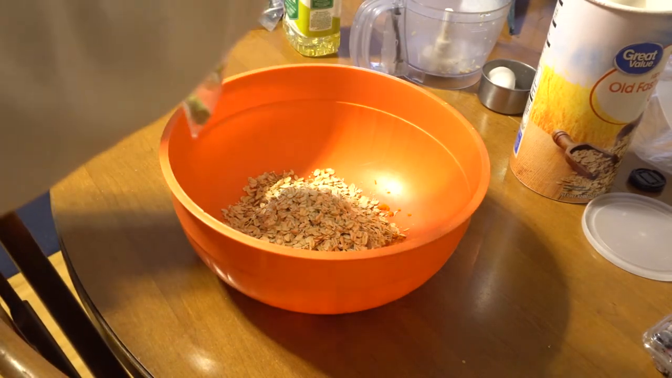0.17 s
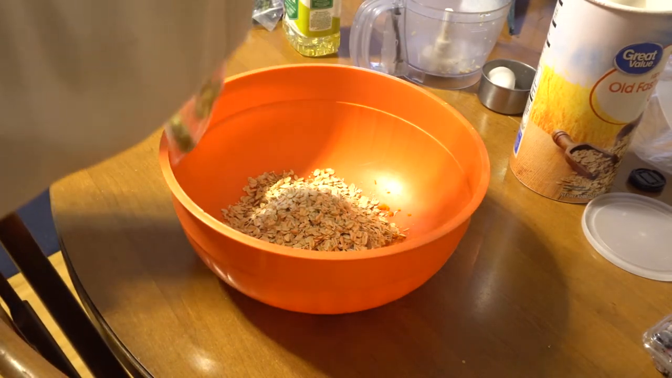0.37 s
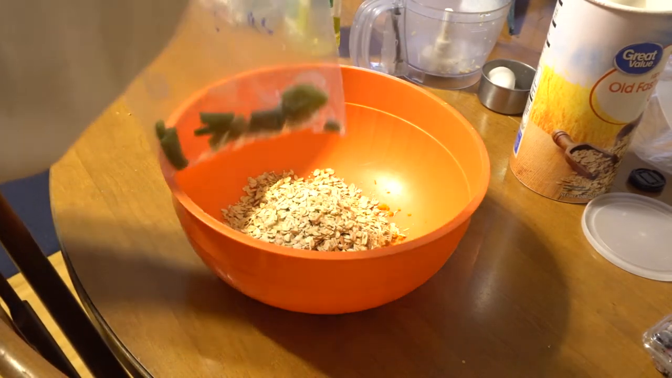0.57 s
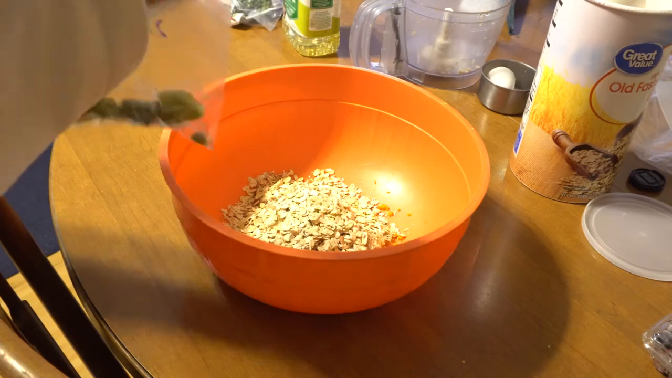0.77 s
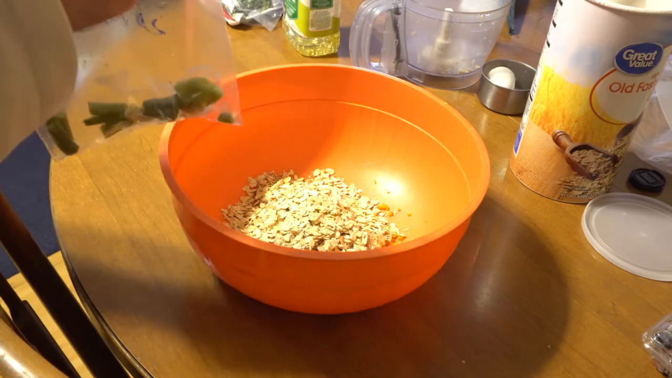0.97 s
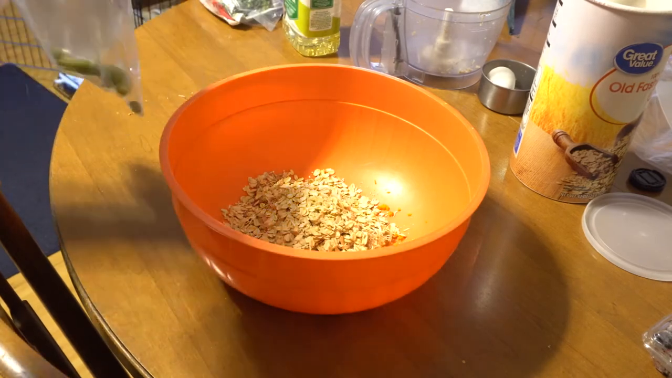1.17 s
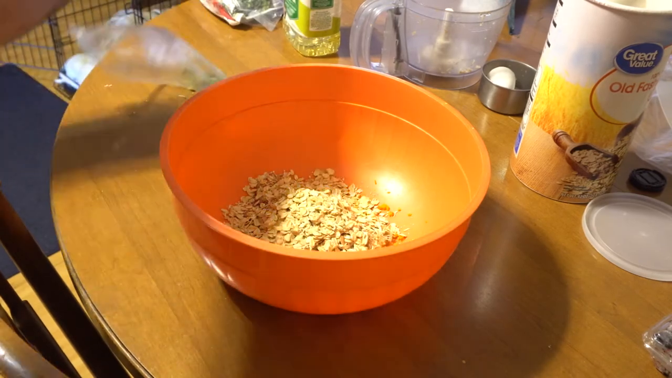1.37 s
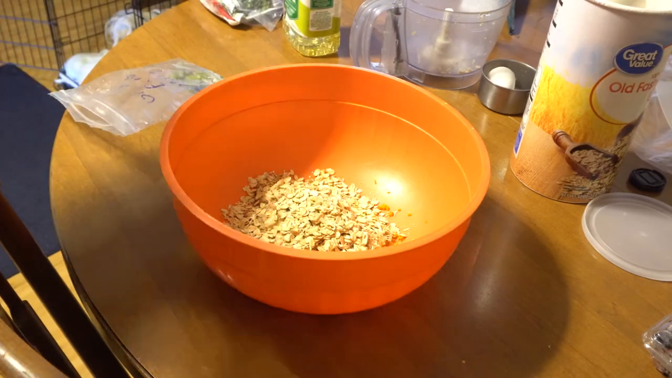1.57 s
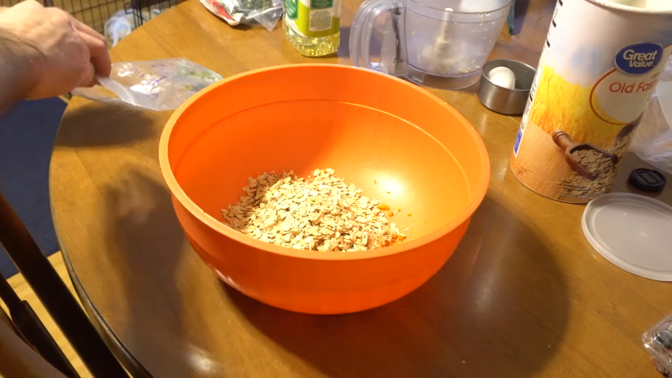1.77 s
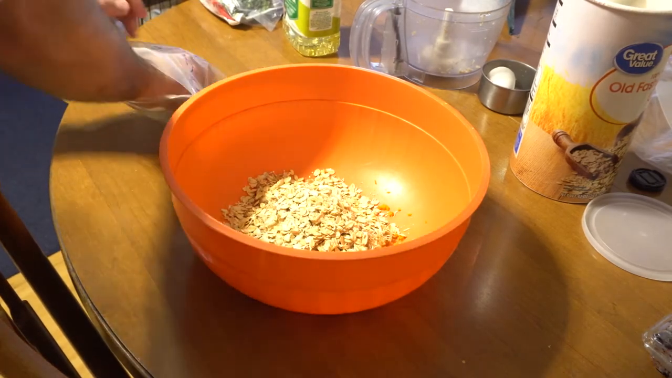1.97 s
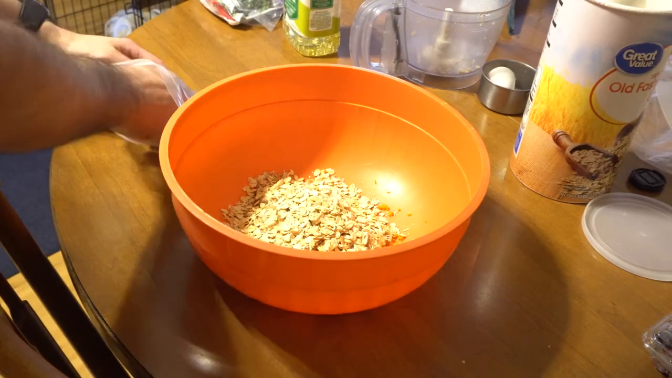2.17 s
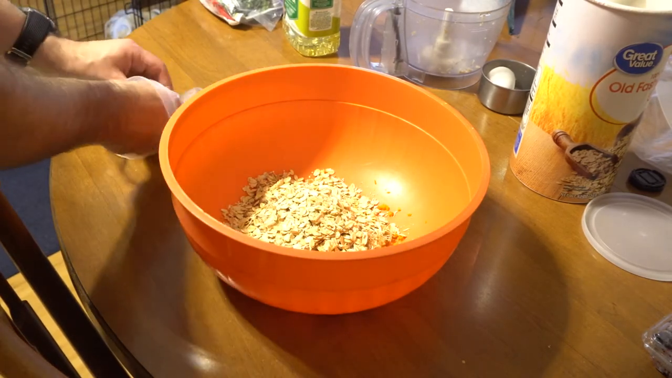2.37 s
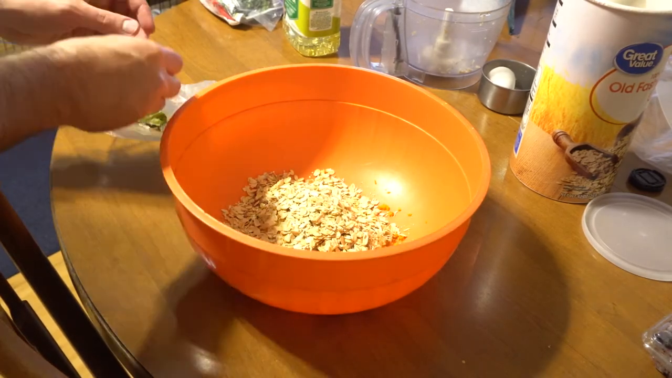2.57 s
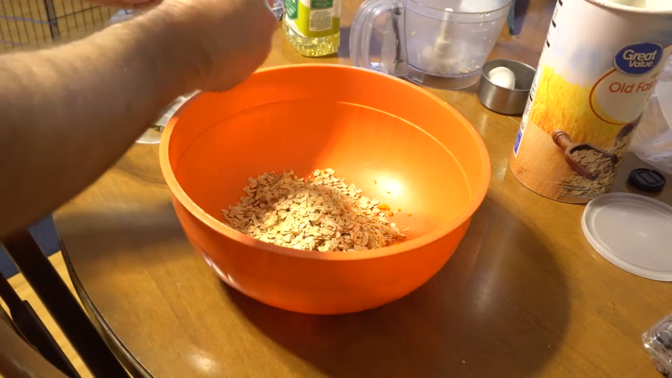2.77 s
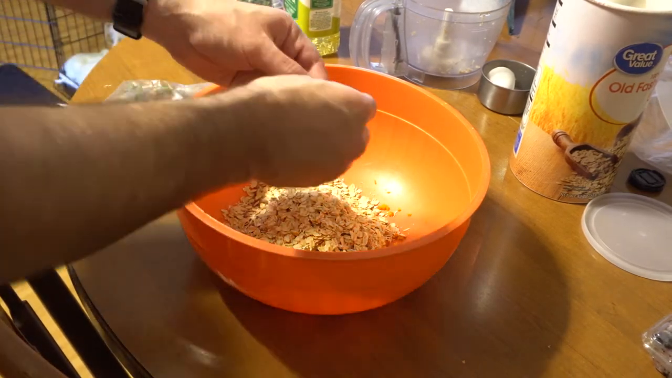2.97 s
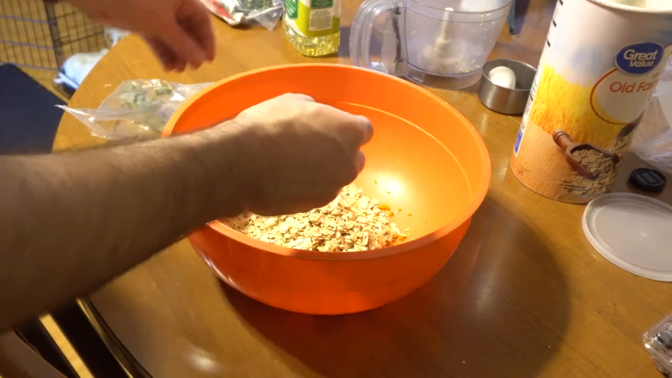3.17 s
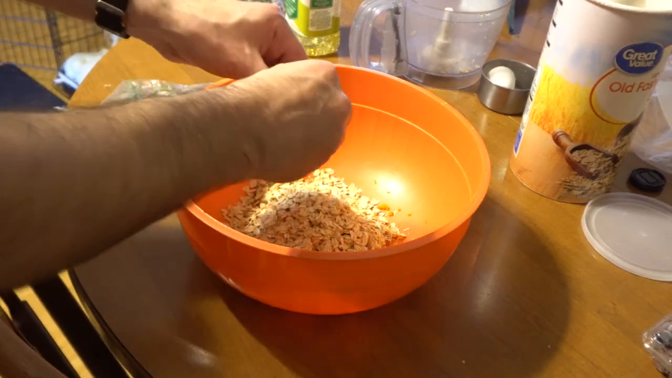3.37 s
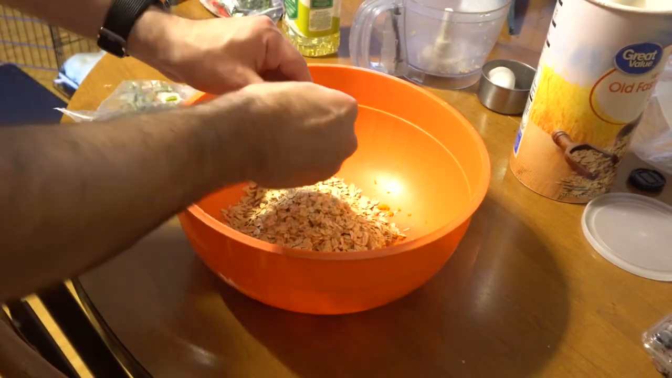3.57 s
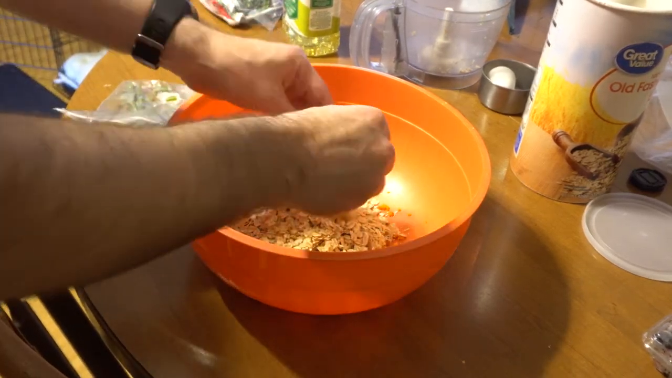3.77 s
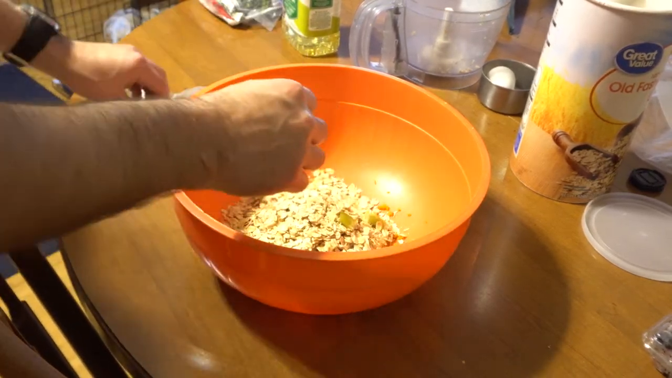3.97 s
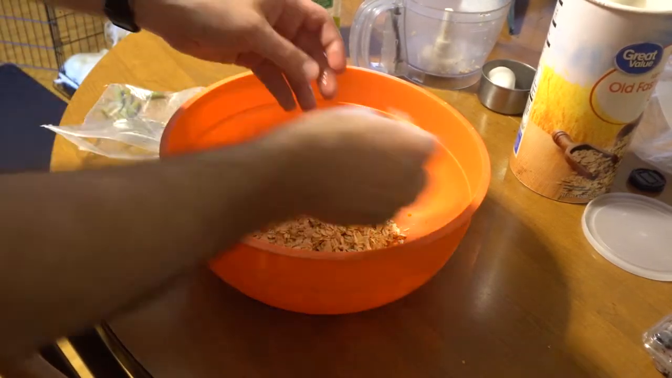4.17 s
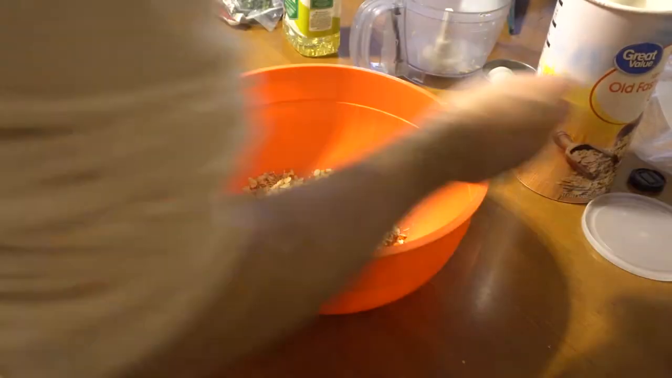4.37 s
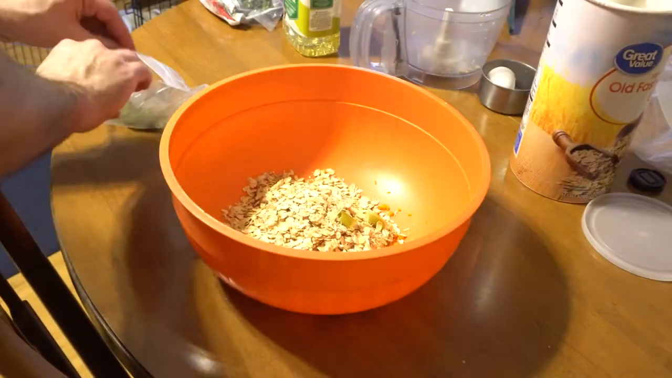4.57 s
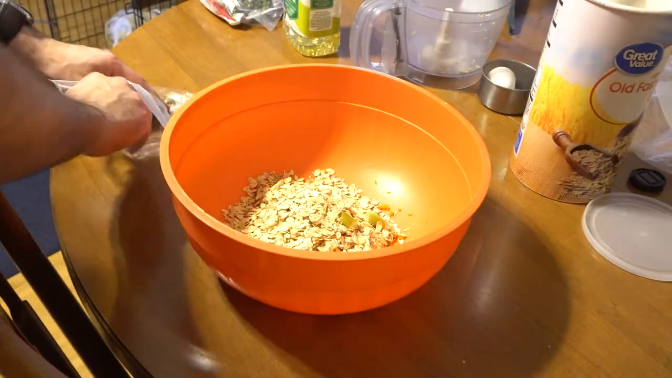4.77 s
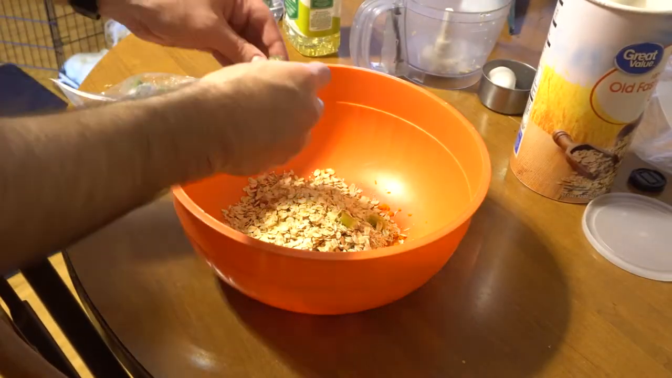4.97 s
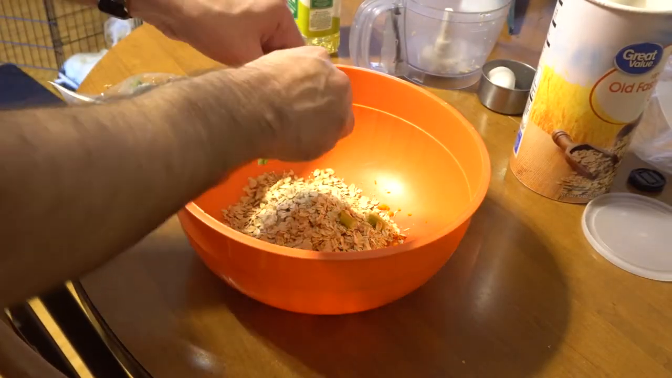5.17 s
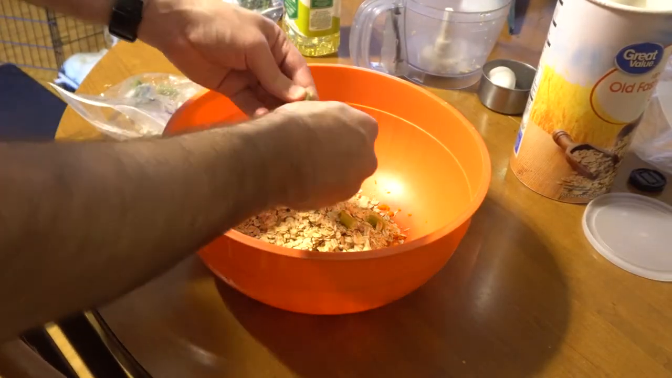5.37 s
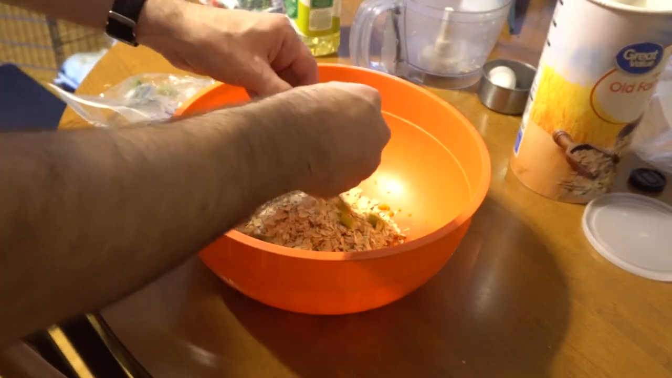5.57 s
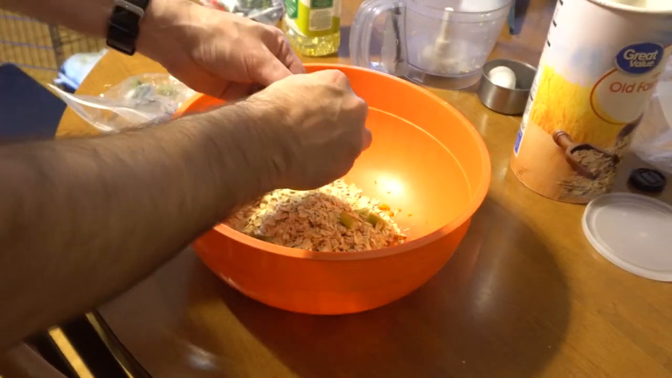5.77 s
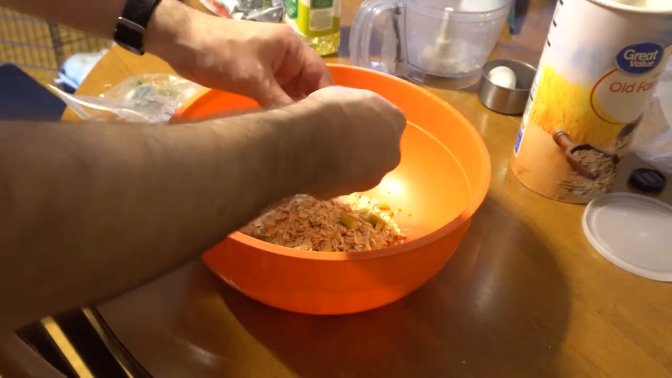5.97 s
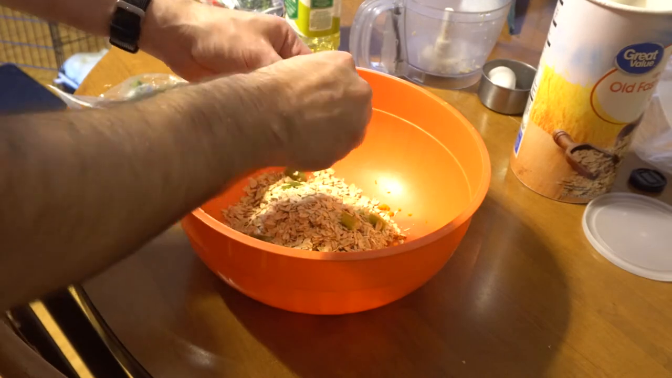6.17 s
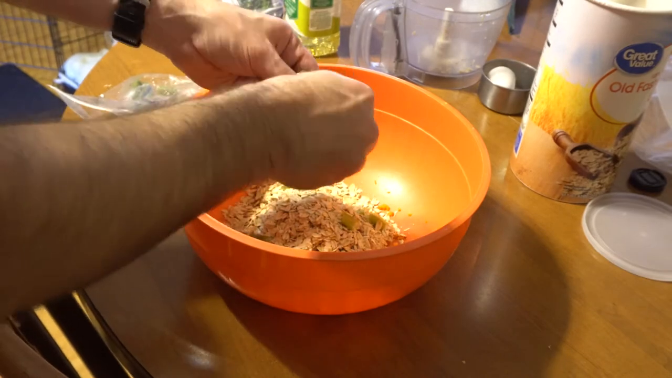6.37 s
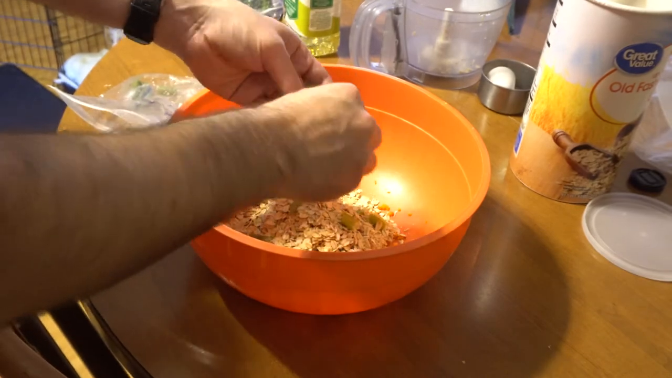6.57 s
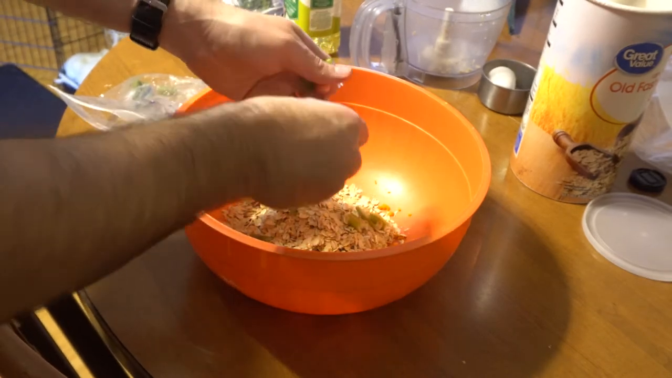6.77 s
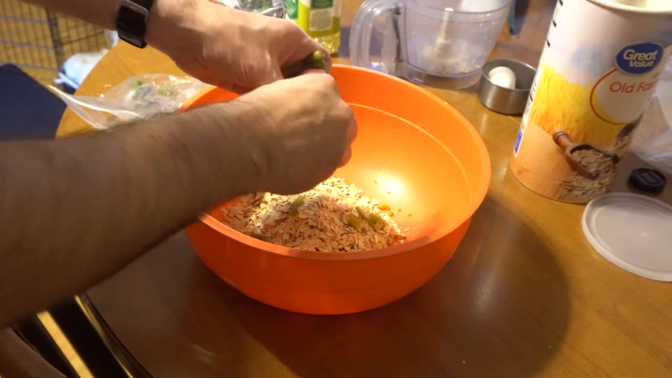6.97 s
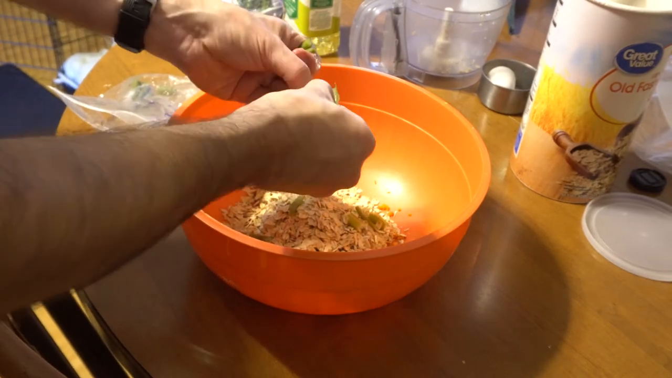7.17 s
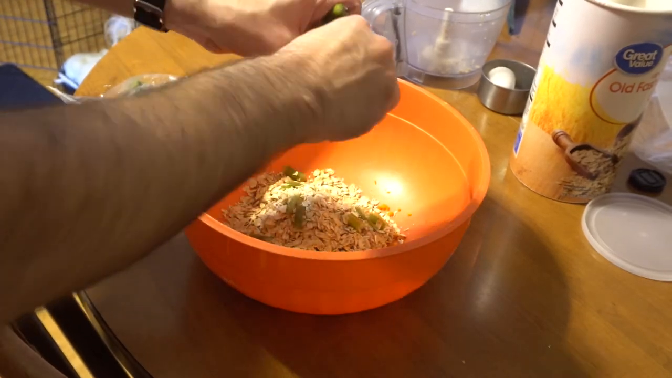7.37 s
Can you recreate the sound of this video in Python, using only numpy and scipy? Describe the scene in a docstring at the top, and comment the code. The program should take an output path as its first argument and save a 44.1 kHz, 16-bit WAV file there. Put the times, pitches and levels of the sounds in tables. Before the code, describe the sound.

A close stereo kitchen scene with quick reflections and a short dull tail. From the start, a low, full rush runs under sharp plastic creases; it swells louder and hollower near 0.44 s with a strong rustle and soft thud, then stops abruptly at about 0.77 s after two dull pops. Bright, crisp bag crinkling peaks from 1.05 to 1.4 s, thins out, and returns in bursts from 1.85 to 2.6 s. A snap with a soft bowl knock lands at 2.83 s. Between 2.95 and 3.95 s, small, high, wet ticks mark beans breaking. Film snaps cluster around 4.3 s, with dense rustling at 4.6 to 4.85 s. Sparse bean ticks follow from 5.3 to 7.25 s, with a light bowl knock near 6.1 s. A faint, steady appliance hiss with hum and thin wavering whines continues throughout.

```python
"""A kitchen: a thin plastic bag of green beans is carried past, set down on a table and opened twice.
Swells of tiny slips make the film rustle, and ringing clicks with fluttering tails snap its creases.
Fingers break beans over a plastic bowl of oats: wet ticks of bright noise, decaying modes for soft knocks.
A low, full rush of shaped noise, with two dull pops near its end, stops abruptly early on.
An appliance of hiss and tones runs throughout."""
import sys
import numpy as np
from scipy import signal
from scipy.fft import rfft, irfft, next_fast_len
from scipy.io import wavfile
from scipy.ndimage import uniform_filter1d

SR = 44100
rng = np.random.default_rng(int(sys.argv[2]) if len(sys.argv) > 2 else 0)


def pcm_store(signal):
    """Save signal as 16-bit PCM."""
    levels = np.round(np.clip(np.atleast_2d(signal), -1, 1) * 32767)
    wavfile.write(sys.argv[1], SR, levels.astype(np.int16).T)


N = 327222
TIME = np.arange(N) / SR   # [s]
RUSH_END_S = .772   # the low rush stops


def from_db(db):
    """Turn decibels into an amplitude factor."""
    return 10 ** (np.asarray(db) / 20)


def rms_one(x):
    """Scale a sound to rms 1."""
    return x / np.sqrt(np.mean(x ** 2) + 1e-20)


def steady(x, window_s=0.024):
    """Even out the short-term level of a stereo sound to about rms 1."""
    power = uniform_filter1d(np.mean(x ** 2, axis=0), size=int(window_s * SR))
    return x / np.sqrt(power + 1e-20)


def add(track, s, sound):
    """Mix a sound into the track at a time in seconds."""
    at = max(round(s * SR), 0)
    track[..., at:at + sound.shape[-1]] += sound[..., :N - at]


def cut(x, hz, kind, order=2):
    """Butterworth low- or high-pass."""
    return signal.sosfilt(signal.butter(order, min(hz, .45 * SR), kind, fs=SR, output="sos"), x)


def resonate(x, hz, width_hz):
    """One resonance with a gain of about 1 at its peak."""
    r = np.exp(-np.pi * width_hz / SR)
    feedback = [1, -2 * r * np.cos(2 * np.pi * hz / SR), r * r]
    return signal.lfilter(np.array([1, 0, -1]) * (1 - r * r) / 2, feedback, x)


def coloured(x, spectrum):
    """Filter a signal along a smooth spectral curve; rms 1."""
    hz, db = np.transpose(spectrum)
    size = next_fast_len(N + SR // 4)
    bins = np.maximum(np.fft.rfftfreq(size, 1 / SR), 1)
    gain = from_db(np.interp(np.log(bins), np.log(hz), db))
    return rms_one(irfft(rfft(x, size) * gain, size)[..., :N])


def drift(rate):
    """Random wandering through new values at a rate per second; rms 1."""
    knots = rng.standard_normal(int(rate * N / SR) + 2)
    return rms_one(np.interp(TIME * rate, np.arange(len(knots)), knots))


def stereo_noise(width):
    """White noise that the two channels share more or less, by frequency."""
    hz, db = np.transpose(width)
    mid, side = rng.standard_normal((2, N))
    bins = np.maximum(np.fft.rfftfreq(N, 1 / SR), 1)
    side = irfft(rfft(side) * from_db(np.interp(np.log(bins), np.log(hz), db)), N)
    return mid + side * np.array([[1], [-1]])


def grains(per_s, spread_db, size, pan_db=5.5):
    """Random stereo clicks of uneven strength, each from its own spot; rms 1."""
    born = rng.random(size) < per_s / SR
    strength = from_db(spread_db * np.minimum(rng.exponential(1, size), 5))
    strength = strength * rng.choice([-1, 1], size)
    pan = from_db(pan_db * rng.standard_normal(size) * np.array([[.5], [-.5]]))
    return rms_one(born * strength * pan)


def swell(start, end, rise_s, fall_s):
    """Gain that builds up to the start, holds 1 until the end and dies away."""
    before = np.maximum((start - TIME) / rise_s, 0)
    after = np.maximum((TIME - end) / fall_s, 0)
    return np.exp(-np.minimum(before + after, 20))


def jerks(per_s, fall_s, spread_db):
    """Gain that jumps at each random slip and then dies away; rms 1."""
    slips = (rng.random(N) < per_s / SR) * from_db(spread_db * rng.uniform(-0.57, 1, N))
    power = signal.lfilter([1], [1, -np.exp(-2 / (fall_s * SR))], slips ** 2 + 1e-18)
    return rms_one(np.sqrt(power))


def appliance(hum_db=2.0, whine_db=1.0, whine_waver_db=2.0, whine_width_hz=18, walls_db=-10.0):
    """Steady hiss, a hum of pure tones, a wavering low drone and narrow whines of resonant noise."""
    # hiss spectrum: (frequency [Hz], relative level [dB])
    hiss_spectrum = [(24, -70), (40, -43), (150, -37.5), (243, -34), (276, -32), (305, -27.5), (329, -34),
                     (440, -17.5), (542, -25.5), (585, -14.5), (831, -13), (918, -6), (1370, 0.5),
                     (2980, -2.5), (4570, -2.5), (16000, -13)]
    # stereo width of the hiss: (frequency [Hz], side minus mid [dB])
    hiss_width = [(110, -8), (200, -8), (380, -18.5), (1290, -22), (2380, -11.5), (4400, -3.5), (8120, -10),
                  (15000, -27)]
    # pure tones: (frequency [Hz], rms level before hum_db [dB])
    hum_tones = [(274.5, -100.5), (597.5, -83.5)]
    # whistling bands: (frequency [Hz], rms level before whine_db and waver [dB])
    whine_bands = [(1200, -78.5), (1394, -76), (1895, -72), (2229, -74), (2401, -71), (3499, -74),
                   (4673, -70.5)]
    air_db = -54.5
    drone_hz, drone_width_hz, drone_db, drone_waver_db = 460, 20, -91, 2

    walls = from_db(walls_db) * rng.standard_normal((1, SR // 30)) / np.sqrt(SR // 30)
    flow = stereo_noise(hiss_width)
    # reflections leave a fixed ripple in the hiss
    flow = flow + signal.fftconvolve(flow, walls, mode="same", axes=1)
    hiss = from_db(air_db) * coloured(flow, hiss_spectrum)

    hum = sum(from_db(db + hum_db) * np.sqrt(2) * np.sin(2 * np.pi * hz * TIME) for hz, db in hum_tones)

    air = stereo_noise(hiss_width)
    whine = 0
    for hz, db in whine_bands:
        level = from_db(db + whine_db + whine_waver_db * drift(6))
        whine = whine + level * rms_one(resonate(air, hz, whine_width_hz))

    drone = resonate(resonate(air, drone_hz, drone_width_hz), drone_hz, drone_hz / 10)
    drone = from_db(drone_db + drone_waver_db * drift(7)) * rms_one(drone)
    return hiss + hum + drone + cut(whine, 880, "high", order=4)


def low_rush(rough_db=1.0, ring_waver_db=4.0):
    """A low, full rush of shaped noise turns louder and hollower at one swell and stops abruptly."""
    # rush spectrum: (frequency [Hz], relative level [dB])
    rush_spectrum = [(24, -55), (40, -24), (120, -9), (155, -12), (240, -2), (310, 2.5), (470, .5),
                     (760, -1), (1110, -1), (1910, -4.5), (2420, -6.5), (3000, -6.5), (3900, -6),
                     (6600, -120)]
    # resonances that make the swell hollow: (frequency [Hz], width [Hz], relative level [dB])
    hollows = [(373, 19, -14), (872, 51, -6), (1327, 24, -12), (1810, 340, -7)]
    rush_db = -51.5
    swell_s, swell_db, swell_rise_s, swell_fall_s = 0.443, -42.5, 0.017, 0.087

    surge = from_db(swell_db) * swell(swell_s, swell_s, swell_rise_s, swell_fall_s)
    sounding = np.clip((RUSH_END_S - TIME) / 0.0044, 0, 1)
    noise = stereo_noise([(200, -18.5), (1400, -3.5)])
    rings = 0
    for hz, width_hz, db in hollows:
        ring = steady(resonate(resonate(noise, hz, width_hz), hz, hz / 2))
        rings = rings + from_db(db + ring_waver_db * drift(15.1)) * ring

    rush = coloured(noise, rush_spectrum)
    low = cut(rush, 1000, "low")
    rush = rush - low + np.std(low) * steady(low)   # only the lows are evened out
    rush = rush * np.hypot(from_db(rush_db), surge) + rings * surge
    return cut(rush * sounding * from_db(rough_db * drift(39.5)), 85, "high")


def wrinkles(fizz_db=2.0, patchy_db=3.5, crinkle_db=-8.5):
    """Wrinkles give way in quick, sharp runs over a thin fizz; ever different panels of film colour them."""
    # film spectrum: (frequency [Hz], relative level [dB])
    film_spectrum = [(290, -47), (500, -36), (586, -28.5), (843, -20), (1090, -15), (1620, -9.5),
                     (1950, -5), (2330, -6), (5710, -3.5), (10200, 4.5), (15500, 2), (16000, -13.5)]
    runs = np.hypot(from_db(fizz_db), jerks(per_s=300, fall_s=0.0013, spread_db=4.0))
    slips = rms_one(grains(per_s=30000, spread_db=1.5, size=N, pan_db=1.0) * runs)
    slips = steady(slips, window_s=0.014)   # the hands feed in energy evenly
    # separate crinkles stand out
    slips += from_db(crinkle_db) * grains(per_s=220, spread_db=1.6, size=N, pan_db=2.5)
    panels = sum(resonate(slips, hz, hz * 0.18) * drift(70) for hz in np.geomspace(2000, 14000, 8))
    return coloured(slips + (from_db(patchy_db) - 1) * panels, film_spectrum)


def rustle(split_hz=6500, body_db=-6.5, treble_db=-2.5):
    """Countless small wrinkles slip as the film moves; each crush is a swell of them, and harder means fuller."""
    # the hands keep the film moving: (start [s], end [s], level before the band trims [dB])
    holds = [(0.365, 0.529, -43.5), (.68, 1.02, -53.5), (1.066, 1.417, -47.5), (1.554, 1.855, -56.5),
             (1.882, 2.05, -45), (2.107, 2.252, -47.5), (2.265, 2.31, -44.5), (2.363, 2.447, -44),
             (2.49, 2.56, -46.5), (4.618, 4.767, -42.5), (4.8, 4.848, -43)]
    # handfuls of film crushed: (time [s], peak level before the band trims [dB], rise time constant [s])
    crushes = [(0.01, -37.5, 0.017), (0.393, -38.5, 0.01), (0.441, -30.5, 0.018), (0.7, -40, 0.022),
               (1.1, -34, 0.0085), (1.137, -36, 0.0093), (1.203, -31, 0.011), (1.239, -33, .003),
               (1.248, -30, 0.0081), (1.341, -40.5, 0.0083), (1.888, -35.5, 0.0055), (1.955, -40, 0.0071),
               (1.989, -34, 0.017), (2.136, -38, 0.0076), (2.22, -42.5, 0.014), (2.276, -40.5, 0.01),
               (2.364, -43, 0.025), (2.44, -42, .008), (2.514, -37.5, 0.018), (4.012, -43.5, 0.018),
               (4.506, -47, 0.0089), (4.685, -36, 0.018), (4.699, -30.5, 0.005), (4.723, -33.5, 0.0066)]
    grip_s, let_go_s = 0.017, 0.032   # time constants of the rustle before and after a hold
    crush_fall = 1.7   # a crush dies away this many times slower than it builds
    # a firm grip moves larger panels: extra dB of body per dB of level above firm_db
    firm_db, body_growth = -29, 0.024
    dull_db = -9   # the rustle is duller until the low rush stops

    power = sum((from_db(db) * swell(start, end, grip_s, let_go_s)) ** 2 for start, end, db in holds)
    for s, db, rise_s in crushes:
        power = power + (from_db(db) * swell(s, s, rise_s, rise_s * crush_fall)) ** 2
    level = 10 * np.log10(power)
    body = from_db(level + body_db + body_growth * (level - firm_db))
    treble = from_db(level + treble_db + dull_db * (TIME < RUSH_END_S))
    film = wrinkles()
    low = cut(film, split_hz, "low", order=3)
    high = cut(film, split_hz, "high", order=3)
    return rms_one(low) * body + rms_one(high) * treble


def snaps(crack_db=0.0, body_db=1.0, treble_db=3.0, ring_db=-0.5, ring_width_hz=900, low_share=0.68,
          bottom_hz=2700, split_hz=6500, top_hz=7000, scatter_db=3.0, buckle_db=-22, buckle_t60=0.016):
    """A crease flips with a crack and buckles on for milliseconds; the film panel around it flutters and rings."""
    # creases snapping, near 2.83 s the crack of the bag striking, and near 4.29 s and 4.36 s further sharp
    # cracks off to the right: (time [s], crack level before crack_db [dB], flutter level before trims [dB],
    # ring [Hz])
    creases = [(0.0382, -26, -41, 2190), (0.155, -19.5, -37.5, 3580), (0.245, -21, -45, 3400),
               (0.282, -26.5, -41.5, 4030), (0.5085, -21, -39, 11700), (.576, -29, -55, 3500),
               (.6125, -37, -65, 11000), (0.6695, -17.5, -34, 5400), (0.7865, -28.5, -44, 6000),
               (.812, -30, -57, 9000), (1.0642, -33, -57, 7000), (1.0695, -28, -46, 6760),
               (1.079, -21, -34, 9150), (1.0885, -26, -48, 8000), (1.091, -14, -42, 13000),
               (1.131, -24, -44, 11000), (1.169, -34, -50, 12000), (1.186, -23, -36, 12000),
               (1.246, -20, -49, 10000), (1.298, -20, -35.5, 12100), (1.361, -36, -37, 13000),
               (1.3685, -23, -30.5, 3430), (1.826, -31, -44, 9900), (1.946, -33, -40, 13000),
               (2.0105, -27, -35, 6960), (2.1071, -27, -43, 9800), (2.263, -20, -45, 9100),
               (2.321, -29.5, -52, 5770), (2.331, -24, -42, 9900), (2.3555, -23, -43, 10600),
               (2.394, -25, -52, 9100), (2.4995, -30, -43, 10000), (2.5132, -22, -47, 11000),
               (2.5245, -20, -36, 9900), (2.592, -29, -44, 9000), (2.8008, -42, -44.5, 4600),
               (2.8308, -24, -29.5, 2950), (2.8336, -23.5, -54, 6140), (3.2602, -31, -42, 8400),
               (3.321, -35, -46.5, 9400), (3.995, -30, -41.5, 12400), (4.2877, -25, -40, 10600),
               (4.291, -22.5, -46, 4500), (4.2935, -23.5, -32, 5860), (4.356, -28, -36.5, 11100),
               (4.546, -38, -42.5, 10300), (4.6125, -37, -40, 9000), (4.633, -30, -38, 12100),
               (4.655, -30, -49, 11000), (4.682, -39, -38, 7000), (4.698, -23, -37, 10400),
               (4.716, -20, -34, 12500), (4.7673, -23, -36.5, 6460), (4.7925, -27, -41, 9000)]
    flutter_t60 = 0.082   # [s]
    # small panels ring high: treble gained and body lost per octave of ring
    even_panel_hz, panel_tilt_db = 7100, 1.5

    out, t = np.zeros((2, N)), TIME[:SR // 8]
    for s, peak, db, hz in creases:
        tilt = panel_tilt_db * np.log2(hz / even_panel_hz)
        bottom, top = min(low_share * hz, bottom_hz), top_hz + hz   # large slack panels ring low and sound dull
        flutter = grains(per_s=16000, spread_db=2.5, size=len(t), pan_db=scatter_db)
        low = cut(cut(flutter, split_hz, "low", order=3), bottom, "high", order=3)
        high = cut(cut(flutter, split_hz, "high", order=3), top, "low", order=3)
        panel = from_db(db - tilt + body_db) * rms_one(low)
        panel = panel + from_db(db + tilt + treble_db) * rms_one(high)
        panel = panel * from_db(-60 * t / flutter_t60)
        panel = .5 * (panel + from_db(ring_db) * resonate(panel, hz, ring_width_hz))

        buckling = grains(per_s=5200, spread_db=-3.0, size=len(t)) * from_db(buckle_db - 60 * t / buckle_t60)
        click = cut((t == 0) + buckling + 1e-18, bottom, "high", order=3)
        crack = click + 7 * resonate(click, hz, hz * 0.38)
        add(out, s + 0.0013, panel + from_db(peak + crack_db) * crack / np.abs(crack).max())
    return out


def bumps(width_share=0.29):
    """Soft contacts of hands, bag and falling pieces give dull, quickly dying thuds of resonant noise."""
    # soft contacts: (time [s], level [dB], centre [Hz], T60 [s])
    contacts = [(0.439, -36.5, 1790, 0.18), (.44, -42, 380, 0.089), (0.6695, -35.5, 1560, 0.085),
                (2.8333, -45, 2200, 0.088), (4.304, -75, 225, .12), (6.097, -49, 1500, 0.044)]
    out, t = np.zeros(N), TIME[:SR // 4]
    for s, db, hz, t60 in contacts:
        thud = resonate(rng.standard_normal(len(t)), hz, hz * width_share)
        thud = resonate(thud, hz, hz * 6.6)
        add(out, s, rms_one(thud) * from_db(db - 60 * t / t60))
    return out


def pops(t60=0.0091):
    """Short, dry, dull pops: a click and a little fading noise through two broad resonances."""
    # two pops just before the low rush stops: (time [s], peak level [dB], centre [Hz])
    pop_table = [(0.7561, -30.5, 586), (0.7678, -30.5, 950)]
    out, t = np.zeros(N), TIME[:SR // 20]
    for s, db, hz in pop_table:
        click = (t == 0) + 0.08 * rng.standard_normal(len(t)) * from_db(-60 * t / t60)
        pop = resonate(resonate(click, hz, hz), hz, 3 * hz)
        add(out, s, from_db(db) * pop / np.abs(pop).max())
    return out


def bowl(touch_s=0.0014, scatter_db=3.0):
    """A contact sets the oat-damped bowl ringing briefly; a harder one brings out its upper modes."""
    # hands and bean pieces knock on the bowl: (time [s], level [dB], hardness [dB per octave])
    knocks = [(2.695, -63, -3), (2.832, -53.5, 0), (4.103, -63.5, 2), (6.096, -63, 5)]
    # what the bowl rings with: (frequency [Hz], relative level [dB], T60 [s])
    modes = [(356, -13, 0.056), (504, -2, 0.039), (537, -5, .05), (715, -5.5, 0.092), (880, 0, 0.042),
             (1143, 8, 0.061), (1365, -1, 0.04), (1780, 0, .04)]
    out, t = np.zeros(N), TIME[:SR // 4]
    for s, db, hardness in knocks:
        for hz, mode_db, t60 in modes:
            ring = np.sin(2 * np.pi * (hz * t + rng.random())) * (1 - np.exp(-t / touch_s))
            strength = db + mode_db + hardness * np.log2(hz / 800) + scatter_db * rng.standard_normal()
            add(out, s, ring * from_db(strength - 60 * t / t60))
    return cut(out, 290, "high")


def beans(tick_db=12.0, tear_db=-12.5, t60=0.081, width_hz=5500, low_hz=6500):
    """The skin gives way with one tick and a short fizz of tearing fibres."""
    # bean fibres parting between the fingers: (time [s], level before tick_db [dB], centre [Hz])
    breaks = [(2.9552, -49, 9000), (3.002, -42.5, 11000), (3.5345, -45.5, 12400), (3.7149, -48, 11700),
              (3.849, -41.5, 13600), (3.885, -41, 13600), (3.949, -41.5, 8540), (5.2785, -48, 11800),
              (5.325, -46, 11200), (5.3615, -49, 12000), (5.383, -45, 11100), (5.5785, -47, 10900),
              (5.8438, -41.5, 11700), (6.3843, -41, 11600), (6.425, -53, 12000), (7.116, -45.5, 11500),
              (7.2505, -42.5, 10200)]
    out, t = np.zeros((2, N)), TIME[:SR // 10]
    for s, db, hz in breaks:
        fibres = from_db(tear_db - 60 * t / t60) * grains(per_s=8700, spread_db=2.5, size=len(t))
        add(out, s + 0.0015, from_db(db + tick_db) * resonate(3.3 * (t == 0) + fibres, hz, width_hz))
    return cut(out + 1e-18, low_hz, "high", order=2)


def kitchen(x, early_db=-8.5, early_t60=0.12, late_db=-19.0, wall_hz=7000, alike_hz=2200):
    """Table and bowl throw back quick reflections; the walls add a short, duller tail."""
    late_t60 = 0.23   # [s]
    t = TIME[:SR // 2]
    near, far = rng.standard_normal((2, 2, len(t))) * (t > .001)
    near = cut(near, alike_hz, "high") + cut(near[0], alike_hz, "low")   # long waves reach both sides alike
    early = (near + resonate(near, 5600, 3000)) * from_db(-60 * t / early_t60)
    late = cut(far, wall_hz, "low", order=1) * from_db(-60 * t / late_t60)
    echoes = from_db(early_db) * rms_one(early) + from_db(late_db) * rms_one(late)
    return x + signal.fftconvolve(x, echoes / np.sqrt(len(t)), axes=1)[:, :N]


def scene(room_pan_db=0.74):
    """The bag moves from the left over to the right, then back near the middle; the kitchen echoes it."""
    # where the hands work the plastic: (time [s], left minus right level [dB])
    bag_place = [(.4, 2), (1.1, 1.5), (2.0, 0.5), (4.0, 1), (4.3, -1.5), (4.7, 0.5)]
    left = np.array([[.5], [-.5]])
    bag_pan = from_db(np.interp(TIME, *np.transpose(bag_place)) * left)
    bag = (rustle() + snaps()) * bag_pan
    echoing = kitchen(bag + beans() + bumps() + bowl())
    unechoed = low_rush() + pops() + appliance()
    return echoing + unechoed * from_db(room_pan_db * left)


def record(dry):
    """The top is cut steeply above 16 kHz by an elliptic low-pass."""
    return signal.sosfilt(signal.ellip(12, .1, 80, 16000, fs=SR, output="sos"), dry)


dry = scene()
out = record(dry)
pcm_store(out)
```